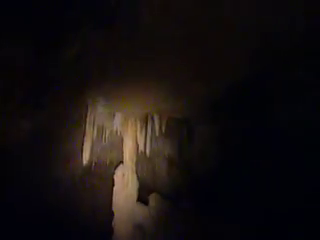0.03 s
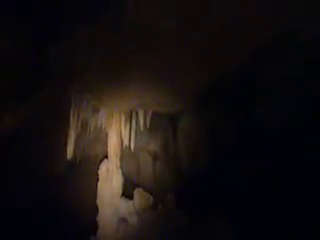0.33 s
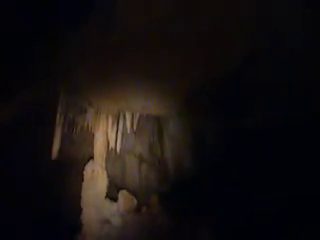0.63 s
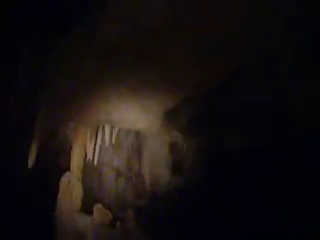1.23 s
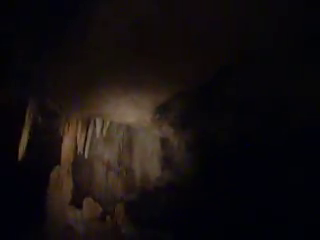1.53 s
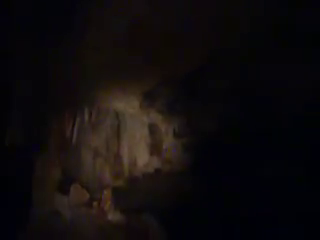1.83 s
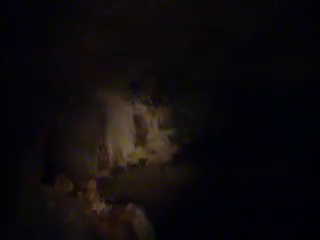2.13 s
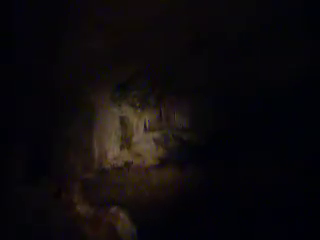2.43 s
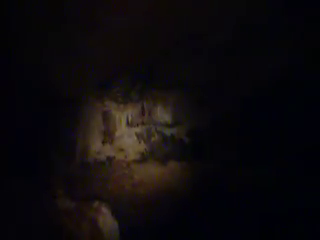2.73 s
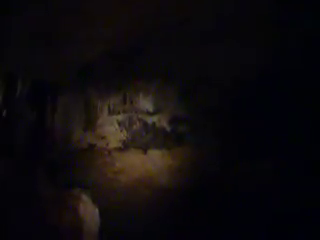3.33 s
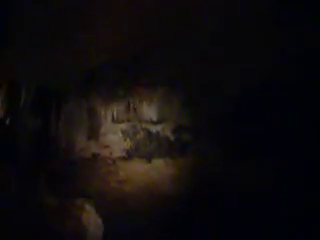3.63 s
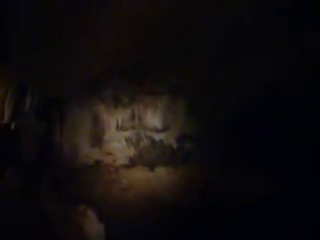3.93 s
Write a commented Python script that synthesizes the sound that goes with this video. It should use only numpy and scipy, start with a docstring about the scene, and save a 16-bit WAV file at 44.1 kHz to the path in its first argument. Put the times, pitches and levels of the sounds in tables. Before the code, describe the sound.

A faint, gritty hiss runs for the whole four seconds, heard from a sealed camera in a flooded cave. It sputters and stalls for instants as a slow low rumble swells, most often in the first second and from 2.4 seconds on. Soft, dull knocks touch the housing, clearest at about 0.3, 1.8 and 2.8 seconds. A barely audible hum and thin whine continue underneath.

```python
"""A gritty hiss that sputters and stalls: the sound of a sealed camera drifting through a flooded cave.
Almost nothing reaches its microphone: a slow rumble with a few larger swings, some soft knocks, and the
camera's own hum, whine and hiss. All of it is about one step of the coarse converter, which flips
between two levels to make the grit and stalls whenever the rumble holds the signal off the threshold."""
import sys
import numpy as np
from scipy import signal
from scipy.fft import rfft, irfft
from scipy.io import wavfile

SR = 44100
rng = np.random.default_rng(int(sys.argv[2]) if len(sys.argv) > 2 else 0)


def materialize(psi):
    """Save the field psi as 16-bit PCM at rate SR to the path in sys.argv[1].

    A 1-D psi becomes a single channel; in a 2-D psi each row is a channel.
    """
    bounded = np.clip(np.atleast_2d(psi).T, -1, 1)
    quanta = np.round(bounded * 32767).astype(np.int16)
    wavfile.write(sys.argv[1], SR, quanta)


N = 176400
TIME = np.arange(N) / SR
CONVERTER_HZ, STEP_DB = 16000, -45.5  # the converter's sample rate and the size of one step


def from_db(db):
    """Decibels to gain."""
    return 10 ** (np.asarray(db) / 20)


def noise(spectrum):
    """Steady noise at rms 1, coloured by (frequency [Hz], relative level [dB]) points."""
    hz, db = np.transpose(spectrum)
    bins = np.maximum(np.arange(N // 2 + 1) * SR / N, 1e-3)
    gain = from_db(np.interp(np.log(bins), np.log(hz), db))
    gain[0] = 0
    x = irfft(rfft(rng.standard_normal(N)) * gain, N)
    return x / x.std()


def converter_grit(dry):
    """A slow, coarse converter rounds to whole steps, so a faint signal chatters between 0 and 1."""
    bias_steps = .47  # resting level, just under the threshold at one half
    sampled = signal.resample_poly(dry, CONVERTER_HZ, SR, axis=-1)
    return np.round(sampled / from_db(STEP_DB) + bias_steps)


def rumble():
    """Slow rumble; its largest swings hold the signal high or low, each briefly stalling the grit."""
    # rumble of water and handling: (frequency [Hz], relative level [dB])
    rumble_spectrum = [(2, -13.5), (5, -4.5), (10, -1.5), (22, -5), (37, -2.5), (50, -11), (75, -7.5),
                       (105, -20), (160, -27), (400, -42.5)]
    # the rumble's largest swings: (centre time [s], length [s], height [converter steps])
    largest_swings = [(0.047, 0.06, 0.51), (.211, .06, -0.32), (0.259, 0.041, 0.43), (.406, 0.059, -0.41),
                      (0.488, 0.025, -0.4), (0.698, 0.058, 0.41), (0.744, 0.048, -0.42),
                      (1.238, 0.059, -0.35), (1.331, 0.052, 0.34), (1.469, 0.059, -0.36),
                      (1.607, .045, 0.3), (1.806, 0.039, 0.38), (2.434, 0.024, -0.48), (2.678, 0.02, -.6),
                      (2.796, .045, -0.51), (2.828, 0.03, 0.53), (2.861, 0.024, -0.55),
                      (3.298, 0.037, -.42), (3.414, 0.041, -0.53), (3.459, 0.046, 0.45),
                      (3.507, .055, -0.29), (3.547, 0.052, .46), (3.609, 0.027, 0.61), (3.682, 0.042, 0.39),
                      (3.728, 0.053, -0.41), (3.859, 0.043, -.32)]
    rumble_db, takeover = -59, .7  # takeover: share of the bed's power ducked at a swing's crest
    bed = from_db(rumble_db) * noise(rumble_spectrum)
    swings = np.zeros(N)
    for centre, length, height in largest_swings:
        arch = np.cos(np.pi * np.clip((TIME - centre) / length, -.5, .5))
        bed *= np.sqrt(1 - takeover * arch)
        swings += from_db(STEP_DB) * height * arch
    return bed + swings


def knocks():
    """Each soft knock on the housing rings briefly at one low pitch, which sags as it dies."""
    # knocks on the housing: (time [s], settled pitch [Hz], level [dB], time to fall 60 dB [s])
    hits = [(.279, 238.7, -44, .15), (1.115, 77.6, -53, .2), (1.757, 151.5, -48.5, 0.063),
            (1.862, 129.7, -50, .1), (2.335, 83, -50.5, 0.1), (2.43, 77.8, -50.5, 0.19),
            (2.76, 170, -43, 0.056), (3.595, 81.8, -53, 0.18)]
    attack_s, settle_s, bend = .004, .012, .25  # the pitch starts sharp by the share `bend`
    out = np.zeros(N)
    for start, hz, db, t60 in hits:
        age = np.maximum(TIME - start, 0)
        cycles = hz * (age + bend * settle_s * (1 - np.exp(-age / settle_s)))
        attack = 1 - np.exp(-age / attack_s)
        decay = from_db(-60 * age / t60)
        out += from_db(db) * attack * decay * np.sin(2 * np.pi * cycles)
    return out


def camera():
    """The camera's own noise bed: steady amplifier hiss, with a hum and thin whine that slowly fade."""
    # hiss of the microphone amplifier: (frequency [Hz], relative level [dB])
    hiss_spectrum = [(100, -7), (150, -4), (200, 1), (260, 1.5), (450, .5), (800, -0.5), (1500, -3),
                     (3000, -5.5), (6500, -8.5), (8000, -12.5), (9000, -34.5)]
    # hum and whine of the camera: (frequency [Hz], rms level at mid-scene [dB])
    partials = [(448.4, -72), (1345, -81.5), (5520, -82.5), (5550, -84), (5580, -79.5)]
    hiss_db, fade_db_per_s = -57.7, .38
    tones = np.zeros(N)
    for hz, db in partials:
        tones += np.sqrt(2) * from_db(db) * np.sin(2 * np.pi * (hz * TIME + rng.random()))
    fade = from_db(-fade_db_per_s * (TIME - TIME.mean()))
    return from_db(hiss_db) * noise(hiss_spectrum) + tones * fade


def scene():
    """Everything that reaches the converter, in mono."""
    return (rumble() + knocks() + camera())[None]


def record(dry):
    """The converter turns the scene to grit; a steep low-pass trims the top and a DC offset is added."""
    cutoff_hz, dc_offset = 8000, -.0773
    upsample = 441  # oversampling on the way from the converter's rate to SR
    low_pass = signal.firwin(32 * upsample + 1, cutoff_hz, window=("kaiser", 9),
                             fs=upsample * CONVERTER_HZ)
    centred = converter_grit(dry) - .5  # the two levels sit either side of zero for filtering
    smooth = signal.resample_poly(centred, SR, CONVERTER_HZ, axis=-1, window=low_pass)[:, :N]
    return from_db(STEP_DB) * (smooth + .5) + dc_offset


dry = scene()
out = record(dry)
materialize(out)
```